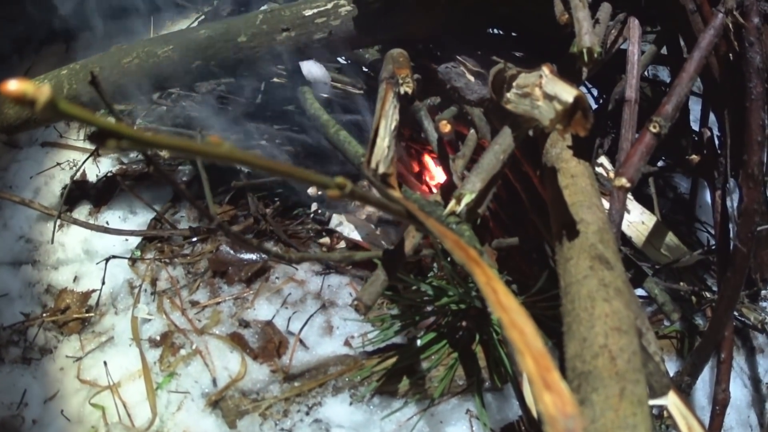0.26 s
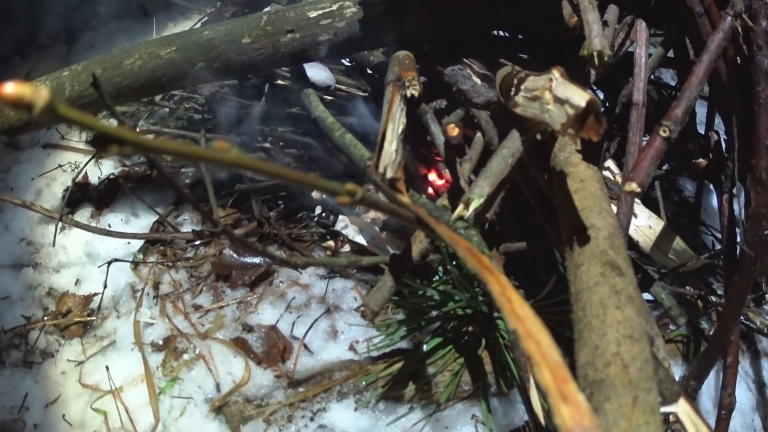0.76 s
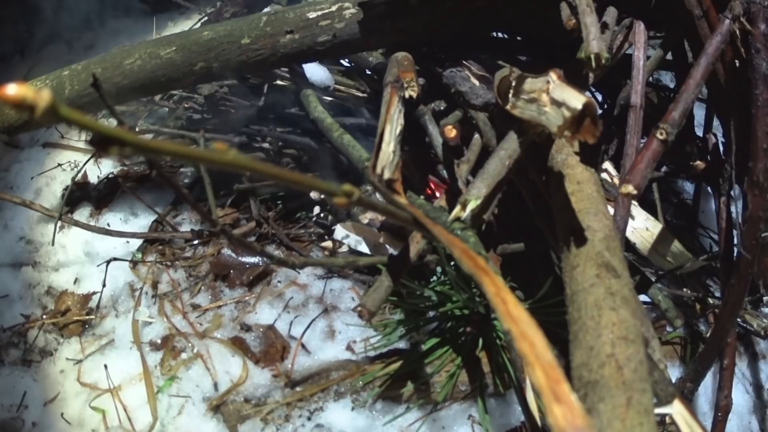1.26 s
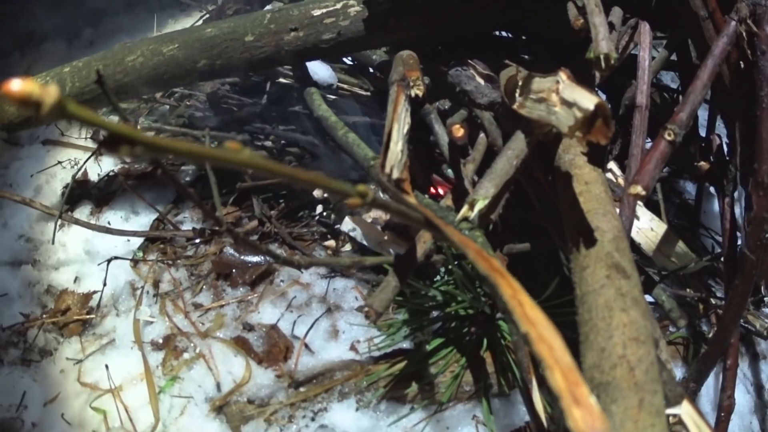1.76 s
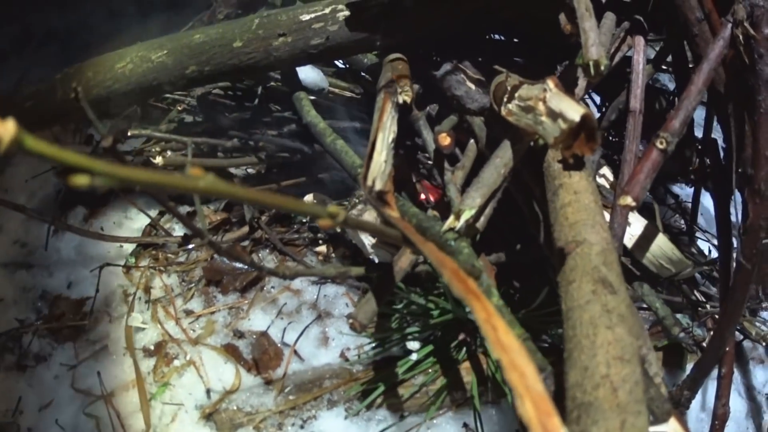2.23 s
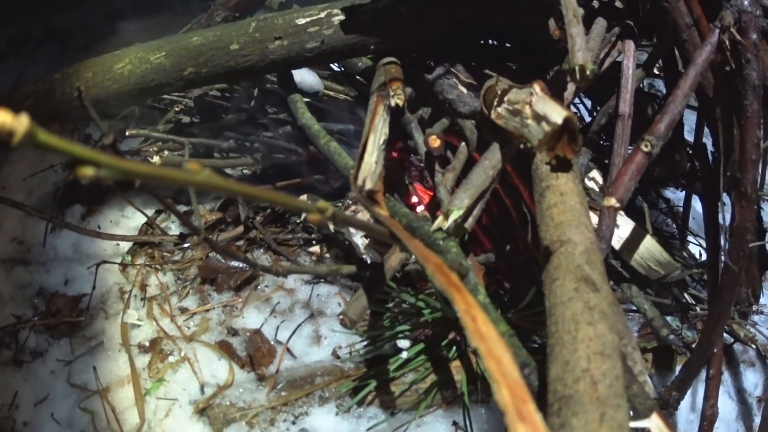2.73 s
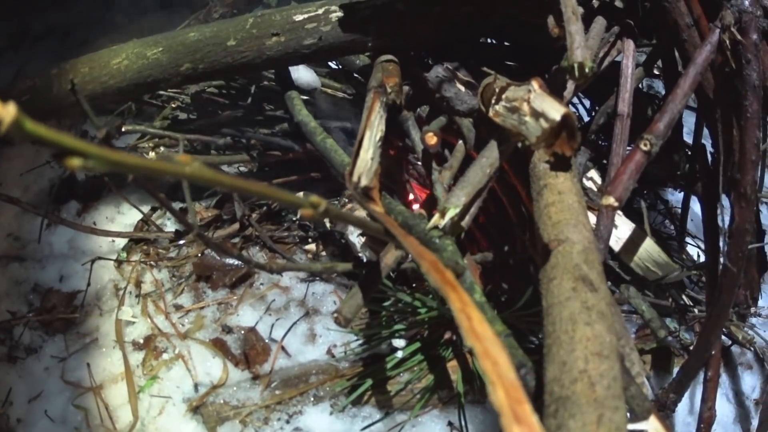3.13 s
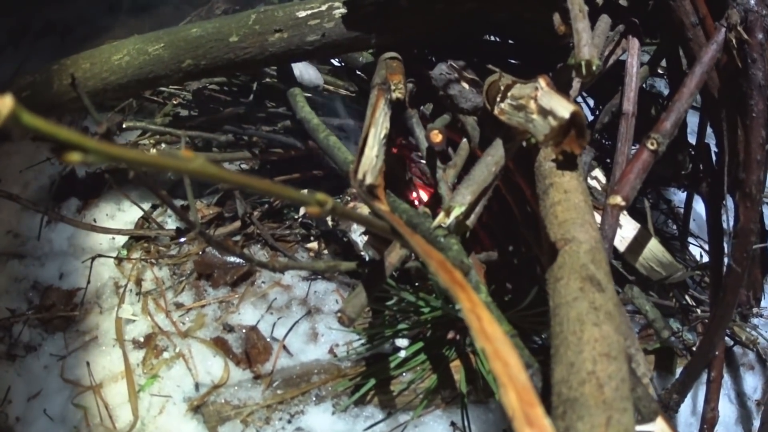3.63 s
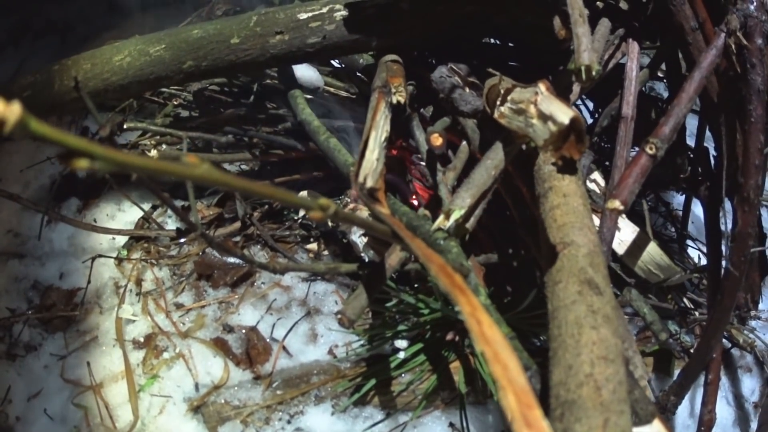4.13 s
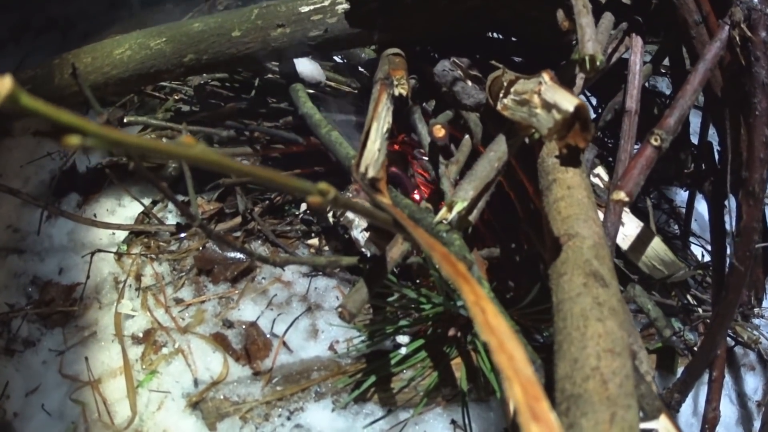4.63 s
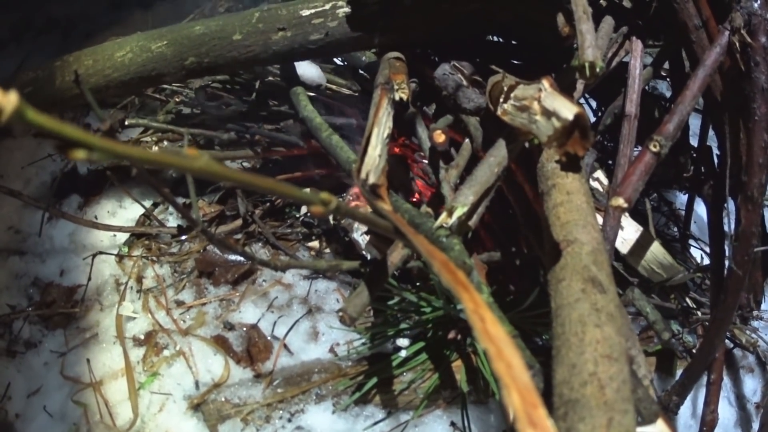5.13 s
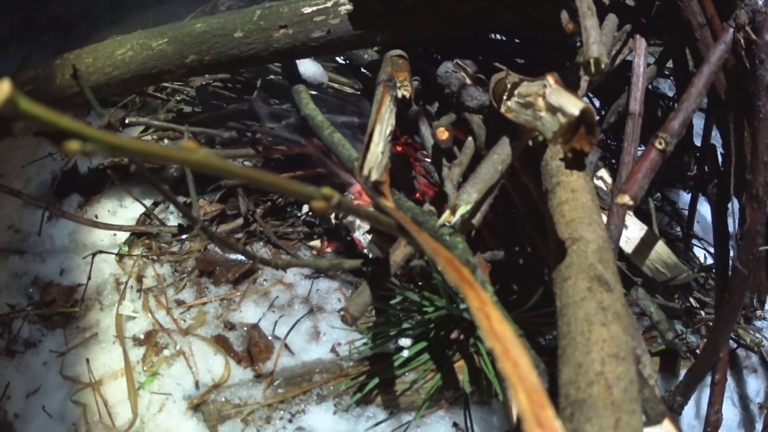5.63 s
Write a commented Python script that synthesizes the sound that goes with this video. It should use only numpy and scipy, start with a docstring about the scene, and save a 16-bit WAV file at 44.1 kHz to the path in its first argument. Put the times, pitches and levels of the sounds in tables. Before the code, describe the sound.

Close stereo microphone on burning twigs on open snowy ground. Fine ticks and one overloaded crack open over a brief breathy flare, followed by two sparse seconds. Crackling then revives with a sharp snap, dense bursts, small rounded pops and thin sap hiss, ending with a hard double crack. A soft low rush of air runs throughout, very dry.

```python
"""A small kindling fire of pine needles and thin twigs, close to a phone, outdoors on snow at night.
Fibres burst in sharp noise-driven snaps that ring the twig and rattle through the stick pile.
Pockets of gas puff as rounded pressure dips; sap sizzles as filtered hiss and tiny ticks.
A brief flare rushes at the start, over night air and draught made of filtered noise and a faint hum.
Two microphone ports hear it slightly apart, and the loudest snaps overload the microphone."""
import sys
import numpy as np
from scipy import signal
from scipy.fft import rfft, irfft, next_fast_len
from scipy.io import wavfile

SR = 44100
rng = np.random.default_rng(int(sys.argv[2]) if len(sys.argv) > 2 else 0)


def wav_record(signal):
    """Record a signal, one row per channel, as 16-bit PCM in the file named by sys.argv[1]."""
    frames = np.transpose(np.atleast_2d(signal))
    bounded = np.clip(frames, -1, 1)
    # unit amplitude maps onto the largest positive 16-bit level
    quanta = np.round(bounded * 32767).astype(np.int16)
    wavfile.write(sys.argv[1], SR, quanta)


N = 259749
TIME = np.arange(N) / SR
PORTS = np.array([[1], [-1]])  # sign of the differing sound at the two microphone ports
BAND_HZ, TOP_HZ = 11150, 16000  # low-pass limits of the sound before and after saturation


def undb(db):
    """Decibels to gain."""
    return 10 ** (np.asarray(db) / 20)


def level(x, db):
    """Scale to an rms level in dB."""
    return x * undb(db) / np.sqrt(np.mean(x ** 2))


def unit(x):
    """Scale each row to an energy of one."""
    return x / np.sqrt(np.sum(x ** 2, axis=-1, keepdims=True))


def over_time(points):
    """Second column of a (seconds, value) table, drawn as straight lines over the whole scene."""
    return np.interp(TIME, *np.transpose(points))


def colour(points, hz):
    """Gain of a (Hz, dB) outline, interpolated over log frequency."""
    at_hz, db = np.transpose(points)
    return undb(np.interp(np.log(np.maximum(hz, 1)), np.log(at_hz), db))


def shape(x, points):
    """Filter a whole track by a (Hz, dB) outline."""
    size = next_fast_len(N)
    gain = colour(points, np.fft.rfftfreq(size, 1 / SR))
    return irfft(rfft(x, size) * gain, size)[..., :N]


def resonance(hz, centre, width):
    """Complex response of one damped mode, gain 1 at its centre."""
    return 1j * hz * width / (centre ** 2 - hz ** 2 + 1j * hz * width)


def decay(t, t60):
    """Exponential fall by 60 dB in t60 seconds, on both sides of time zero."""
    return undb(-60 * np.abs(t) / t60)


def walk(rate):
    """Smooth random drift with a spread near 1, heading for a new value `rate` times a second."""
    steps = rng.standard_normal(4096)
    return 1.2 * np.interp(TIME * rate, np.arange(len(steps)), steps)


def add(track, s, sound):
    """Mix a sound into a track from time s in seconds."""
    start = int(np.clip(s * SR, 0, N - 1))
    track[..., start:start + sound.shape[-1]] += sound[..., :N - start]


def snaps(rows, rattle_t60=0.0067, tear_db=-11, tear_t60=0.0048,
          body_hz=1000, body_width_hz=1500, apart=0.18, size=1024):
    """Fibres tear, give way in one spike and rattle off nearby sticks; all ring the twig and its body."""
    lead = size // 4
    t = (np.arange(size) - lead) / SR
    hz = np.fft.rfftfreq(size, 1 / SR)
    heard = hz < BAND_HZ
    body = resonance(hz, body_hz, body_width_hz) ** 2
    body = body / np.linalg.norm(body)
    out = np.zeros((2, N))
    for s, db, ring_hz, width_hz, body_db, rattle_db in rows:
        noise = rng.standard_normal((3, size))
        tear = unit(noise[0] * decay(t, tear_t60) * (t < 0))
        common, differing = unit(noise[1:] * decay(t, rattle_t60) * (t > .0001))
        # the direct spike reaches both ports together; the scattered part differs a little
        rattle = common + apart * PORTS * differing
        spike = t == 0
        push = rfft(spike + undb(rattle_db) * (rattle + undb(tear_db) * tear))
        ring = resonance(hz, ring_hz, width_hz)
        ring = ring / np.linalg.norm(ring * heard)
        burst = push * (ring - undb(body_db) * body)
        # the energy below BAND_HZ sets the level over 1 ms
        energy = np.mean(np.sum(np.abs(burst * heard) ** 2, axis=1)) * 2 / size
        gain = undb(db) * np.sqrt(SR / 1000 / energy)
        add(out, s - lead / SR, gain * irfft(burst))
    return out


def small_crackles(times, gain_db=0.0, limit=1.8):
    """Snap rows for small bursts at these times, each with its own strength and ring."""
    # five random traits per crackle, held within `limit` spreads of their means
    chance = np.clip(rng.standard_normal((len(times), 5)), -limit, limit).T
    db = -43 + 2.9 * chance[0] + gain_db
    ring_hz = 6200 + 1160 * chance[1]
    width_hz = np.abs(4200 + 1300 * chance[2])
    body_db = -11.5 + 8.3 * chance[3]
    rattle_db = 1.5 + 2.4 * chance[4]
    return np.column_stack([times, db, ring_hz, width_hz, body_db, rattle_db])


# Single snaps and lone faint ticks of bursting fibres. Each row: time of the spike in seconds,
# level in dB over 1 ms before the crackle colour, ring in Hz, ring width in Hz,
# woody body against the ring in dB, rattle against the first spike in dB.
SINGLE_SNAPS = [(.0703, -30, 4600, 9000, -18, 11), (0.0754, -25, 6150, 4500, -18, -4),
                (0.1515, -36, 5200, 2506, -20, -5), (0.1782, -34, 10030, 9000, -24, 10),
                (0.2176, -2.5, 6100, 3000, -19.5, -6.5), (0.2241, -17.5, 6830, 9000, -8, -16),
                (.245, -27, 2800, 9000, -16, 6), (.2538, -20, 7940, 9000, -14, 9),
                (.2589, -26.5, 4600, 9000, -4, 0), (0.2673, -20, 2600, 9000, -19.5, -14),
                (0.2727, -24, 8000, 9000, -24, 3), (0.2761, -23.5, 8000, 6500, -21, 0),
                (0.316, -31, 5000, 9000, -24, -4), (0.394, -38.5, 6600, 9000, -10, 2),
                (.5275, -34.5, 7450, 6500, -16, 12), (0.7544, -30, 4070, 6550, -13, -2),
                (.814, -27.5, 5400, 8900, -7, 4), (0.8882, -30.5, 7440, 6500, -24, -6),
                (1.0223, -39, 7200, 6500, -24, -6), (1.2829, -42, 3000, 9000, -24, 0),
                (1.4871, -40, 3600, 3010, -8, -4), (1.5247, -25.5, 6350, 4500, -35, -10),
                (1.6277, -28, 6000, 9000, -12, 10), (1.6314, -21, 5030, 2000, -10.5, -6),
                (1.65, -36.5, 4400, 3000, -20, 0), (1.9882, -36, 3820, 3000, -4, -6),
                (2.0009, -30.5, 5550, 3000, -19, -12), (2.0526, -29.5, 6600, 6500, -20, 0),
                (2.1259, -29.5, 5500, 4500, -23, -4), (2.2457, -36.5, 6400, 2500, -8, -2),
                (2.2736, -33.5, 4700, 9000, -20, -19), (2.412, -29.5, 6890, 9000, -20, -4),
                (2.4682, -31, 4200, 9000, -24, -2), (2.4791, -16.5, 7200, 6500, -8.5, -13),
                (2.547, -34.5, 3400, 2000, -4, -13), (2.5531, -31, 2600, 9000, -10, -8),
                (2.5603, -3, 4740, 5000, -19.5, -6.5), (2.5718, -29, 10000, 9000, -15, -1),
                (2.6087, -16.5, 4060, 2500, -14, -7), (2.617, -22.5, 5800, 9000, -17, -9),
                (2.6393, -25, 6000, 6500, -6, 4), (2.6512, -21, 6000, 4500, -11, 1),
                (2.6523, -16.5, 6160, 3500, -24, -2), (2.7537, -30.5, 8200, 4500, -24, -5),
                (2.83, -33, 4400, 6500, -19, -3), (2.8399, -30, 8740, 9000, -24, 5),
                (2.8867, -21, 5400, 3000, -11, -3), (2.9025, -29.5, 6200, 4500, -10, 5),
                (3.0653, -34, 6200, 3000, -18, -4), (3.1882, -27, 6590, 2996, -13, -3),
                (3.2512, -26, 6200, 6500, -12, -2), (3.281, -29.5, 5000, 6500, -21, 5),
                (3.3292, -32.5, 6800, 4500, -21, -8), (3.3988, -25, 6160, 2000, -11, -7),
                (3.574, -33, 6430, 2526, -7, -1), (3.6406, -34, 7400, 6500, -24, 1),
                (3.795, -28.5, 7200, 9000, -17, -9), (3.8087, -27.5, 5600, 3000, -1, 1),
                (3.8322, -24.5, 5960, 3000, -22, 9), (3.941, -26.5, 4900, 3000, -6, 8),
                (4.0026, -30, 4200, 9000, -15, 7), (4.0062, -25.5, 5220, 9000, -7, -1),
                (4.0489, -27.5, 3300, 2000, -16, 1), (4.1836, -32.5, 5580, 3000, -3, -15),
                (4.1972, -23.5, 6850, 9000, -17, -5), (4.249, -34.5, 4350, 4500, -8, -3),
                (4.343, -34, 7400, 9000, -16, 11), (4.3629, -29, 5200, 2000, -24, -7),
                (4.3786, -34.5, 4800, 3000, -18, -1), (4.3838, -29, 6200, 2500, -11, -10),
                (4.417, -24, 7500, 4500, -12, -9), (4.4268, -22, 5360, 2500, -21, -7),
                (4.43, -27, 6200, 4000, -22, 9), (4.4427, -27, 7400, 6500, -10, 1),
                (4.4857, -25.5, 5600, 4500, -3, 1), (4.5561, -24, 7160, 9010, -13, -7),
                (4.6232, -24, 4100, 3000, -19, -13), (4.6838, -30, 7600, 9000, -13, -4),
                (4.6909, -33, 7500, 9000, -4, 4), (4.8234, -26.5, 3400, 6500, -5, -2),
                (4.8534, -33, 4400, 6500, -12, 0), (4.894, -23, 7710, 4500, -16, -7),
                (4.9266, -12, 4960, 3500, -34, -4), (4.9273, -8.5, 6940, 2580, -44, -10),
                (5.0476, -27, 9000, 6500, -18, -4), (5.0505, -18.5, 6450, 6500, -26, 0),
                (5.056, -23, 5800, 4500, -15, 5), (5.107, -33, 6600, 4500, -7, 2),
                (5.176, -19, 5670, 3000, -7, 2), (5.1846, -24.5, 5800, 2000, -6, 5),
                (5.1962, -15.5, 5450, 3000, -18, -8), (5.2179, -16.5, 3300, 4500, -10, -15),
                (5.2222, -24, 2595, 6500, 3, -10), (5.2495, -31.5, 6000, 3000, -8, -7),
                (5.326, -30, 2600, 4500, 0.5, 3), (5.424, -21, 8000, 8980, -22, -24),
                (5.4758, -31, 5600, 2500, -9, 10), (5.4853, -26, 4600, 3000, -15, -2),
                (5.5224, -34, 6600, 4500, -13, 2), (5.5502, -17, 6130, 9050, -14, 5),
                (5.6661, -4.5, 7900, 4500, -27, -2.5), (5.6695, -5.5, 4250, 3000, -12, -3),
                (5.6744, -28, 8660, 9000, -22, -8), (5.6981, -22.5, 6240, 4500, -8, -4),
                (5.706, -31, 6600, 2000, -22, 0), (5.7239, -33, 5400, 3000, 4, 2),
                (5.733, -36, 5600, 2500, -12, -3), (5.7682, -21.5, 6200, 3000, -16, -2)]


def followers(count=48, shortest_s=.002, mean_further_s=.006, gain_db=2):
    """The louder snaps each tear a neighbouring fibre a moment later."""
    rows = np.array(SINGLE_SNAPS)
    loudest = np.argsort(-rows[:, 1])[:count]
    causes = np.sort(rows[loudest, 0])
    delays = shortest_s + mean_further_s * rng.exponential(size=count)
    return small_crackles(causes + delays, gain_db=gain_db)


# How briskly the needles catch. Each row: time in seconds, small crackles per second.
CRACKLE_RATE = [(0, 46), (.35, 46), (.45, 5.2), (1.9, 4), (2.1, 19.5), (2.6, 18), (2.85, 63), (3.55, 16),
                (4, 45.7), (5.4, 37.6), (5.89, 14)]


def needles(count=400, even_rate=41, brisk_db=1.5):
    """Needles burst at random moments, more often and harder while the fire burns briskly."""
    when, luck = rng.random((count, 2)).T
    times = when * TIME[-1]
    rate = np.maximum(np.interp(times, *np.transpose(CRACKLE_RATE)), 1)
    # each doubling of the rate adds brisk_db; at even_rate per second the mean level holds
    rows = small_crackles(times, gain_db=brisk_db * np.log2(rate / even_rate))
    return rows[luck < rate * TIME[-1] / count]


# Pockets of gas letting go. Each row: time of the deepest point in seconds, depth in dB
# before the air flows back, half-length in ms (to 1/e of the depth).
GAS_PUFFS = [(0.221, -28, 0.66), (2.6108, -23.5, 0.6), (2.8887, -18.5, 0.44), (3.804, -14, 0.46),
             (4.4009, -21, 0.45), (4.5681, -22.5, 0.48), (4.929, -22, 0.99), (5.1772, -19.5, 0.49),
             (5.2333, -22.5, .66), (5.2568, -23, .71), (5.4821, -25, 0.38), (5.725, -29.5, 0.26)]


def puffs(refill_hz=125, size=1024):
    """A pocket of gas gives one rounded dip of pressure; the air flows back in a slower, weaker swing."""
    lead = size // 4
    ms = (np.arange(size) - lead) / SR * 1000
    out = np.zeros(N)
    for s, db, half_ms in GAS_PUFFS:
        add(out, s - lead / SR, -undb(db) * np.exp(-(ms / half_ms) ** 2))
    refill = signal.butter(1, refill_hz, "high", fs=SR, output="sos")
    return signal.sosfilt(refill, out)


# Boiling sap. Each row: time in seconds, sizzle level in dB, to which hiss and ticks are set.
SAP_LEVEL = [(0, -56.5), (.21, -51.5), (.4, -57), (.87, -58), (2.4, -58.5), (2.8, -57), (3.6, -63),
             (4.35, -60), (4.7, -65), (5.5, -58.5), (5.89, -68)]
# Colour of the sizzle. Each row: frequency in Hz, relative density in dB per Hz.
SIZZLE_COLOUR = [(1200, -8), (2500, 0), (4500, 0), (6500, 0), (11000, -4)]


def sizzle(hiss_db=-1, tick_db=-6, apart=0.57, count=900, spread_db=3.5, flicker_db=1.8):
    """Boiling sap: a thin flickering hiss and many tiny ticks from the needles."""
    when, chance = rng.random((count, 2)).T
    ticks = np.zeros(N)
    ticks[(when * N).astype(int)] = undb(spread_db * np.minimum(-np.log(chance), 4))
    # each tick is a click with a short noisy tail
    t = np.arange(256) / SR
    tail = unit(rng.standard_normal(len(t)) * decay(t, 0.0095))
    ticks = signal.fftconvolve(ticks, (t == 0) + tail)[:N]
    jet, scatter = rng.standard_normal((2, N))
    hiss = (jet + apart * PORTS * scatter) * undb(flicker_db * walk(24.67))
    hiss = level(shape(hiss, SIZZLE_COLOUR), hiss_db)
    ticks = level(shape(ticks, SIZZLE_COLOUR), tick_db)
    return undb(over_time(SAP_LEVEL)) * (hiss + ticks)


# The flame's brief flare. Each row: time in seconds, level in dB before its flicker.
FLARE_LEVEL = [(0, -60), (.2, -50), (.4, -59), (.9, -67), (1.3, -78)]
# Colour of the flame's rush. Each row: frequency in Hz, relative density in dB per Hz.
FLAME_COLOUR = [(300, -23), (900, 8), (1600, 8), (3000, -4), (11000, -11)]


def flare(flicker_db=-6.5):
    """The flame's soft flickering rush swells at once and sinks back into the embers."""
    rush = level(shape(rng.standard_normal((2, N)), FLAME_COLOUR), 0)
    return rush * undb(over_time(FLARE_LEVEL) + flicker_db * walk(18))


def surroundings(x, wet_db=-28, t60=0.046, size=8192):
    """Snow and trunks return only a faint, short scatter, different at each port."""
    t = np.arange(size) / SR
    response = unit(rng.standard_normal((2, size)) * decay(t, t60) * (t > .002))
    return undb(wet_db) * signal.fftconvolve(x, response, axes=1)[:, :N]


# Steady rush common to both ports. Each row: frequency in Hz, relative density in dB per Hz.
AIR_COMMON = [(20, -13), (40, -0.5), (90, -0.5), (160, -2), (300, -5), (600, -12), (1100, -18),
              (2000, -26.5), (4000, -31.5), (11000, -35)]
# Steady rush differing between the ports. Each row: frequency in Hz, relative density in dB per Hz.
AIR_DIFFERING = [(20, -15), (90, -7), (200, 0), (400, 2), (750, 1.5), (1300, -3.5), (2200, -9.5),
                 (4000, -16.5), (11000, -26)]
# Strength of the draught. Each row: time in seconds, gain in dB on all of the air.
DRAUGHT_GAIN = [(0, 0.2), (1.2, -0.7), (2.0, -0.94), (3.1, 0.56), (3.7, 0.7), (4.6, 0.7), (5.89, -0.2)]


def air(common_db=-43, differing_db=-48, flutter_db=0.88,
        hum_hz=63.3, hum_db=-62, hum_wander_hz=2.24, hum_waver_db=-3.0):
    """Night air and the flames' draught: a low rush that flutters, with a faint wavering hum in it."""
    common, differing = rng.standard_normal((2, N))
    common = level(shape(common, AIR_COMMON), common_db) * undb(flutter_db * walk(14))
    differing = level(shape(differing, AIR_DIFFERING), differing_db)
    phase = 2 * np.pi * np.cumsum(hum_hz + hum_wander_hz * walk(9)) / SR
    hum = level(np.sin(phase) * undb(hum_waver_db * walk(4.9)), hum_db)
    return (common + hum + PORTS * differing) * undb(over_time(DRAUGHT_GAIN))


# Colour of every crackle at the microphone. Each row: frequency in Hz, gain in dB.
CRACKLE_COLOUR = [(150, 9), (600, 2.5), (1150, -1.5), (1600, -1.5), (2150, -5), (2900, 2), (3900, -0.5),
                  (5200, 1.5), (5950, -0.5), (6500, 0.5), (7800, 1.5), (9000, 2), (10000, 2), (11000, -0.5)]


def scene():
    """The crackling pile, its faint echo and the air around it."""
    bed = sizzle() + flare() + air()
    bursts = np.vstack([SINGLE_SNAPS, followers(), needles()])
    fire = shape(snaps(bursts), CRACKLE_COLOUR) + puffs()
    return fire + surroundings(fire) + bed


def low_pass(x, taps, hz):
    """Steep cut above hz, without delay."""
    kernel = signal.firwin(taps, hz, window="blackman", fs=SR)
    return signal.fftconvolve(x, kernel[None], mode="same", axes=1)


def record(dry, ceiling=1.77, knee=1.18):
    """The sound is kept below BAND_HZ, saturates on the loudest snaps and is cut above TOP_HZ."""
    narrow = low_pass(dry, 601, BAND_HZ)
    rounded = narrow / (1 + np.abs(narrow / ceiling) ** knee) ** (1 / knee)
    return low_pass(rounded, 201, TOP_HZ)


dry = scene()
out = record(dry)
wav_record(out)
```